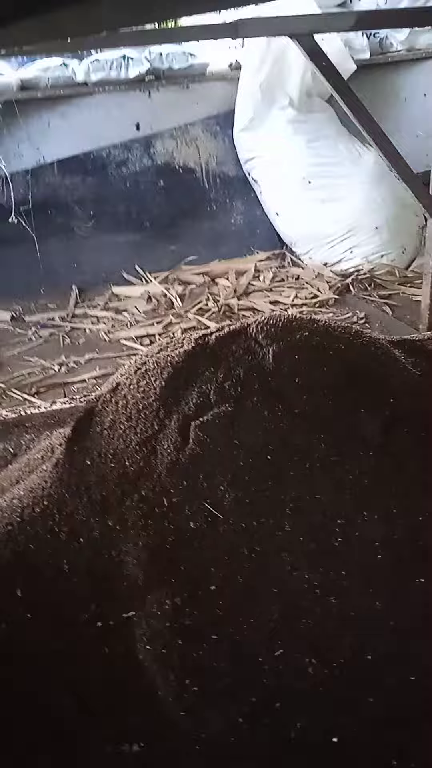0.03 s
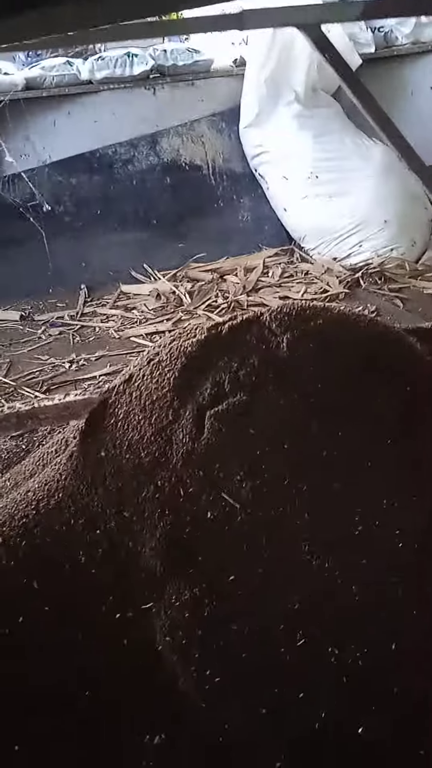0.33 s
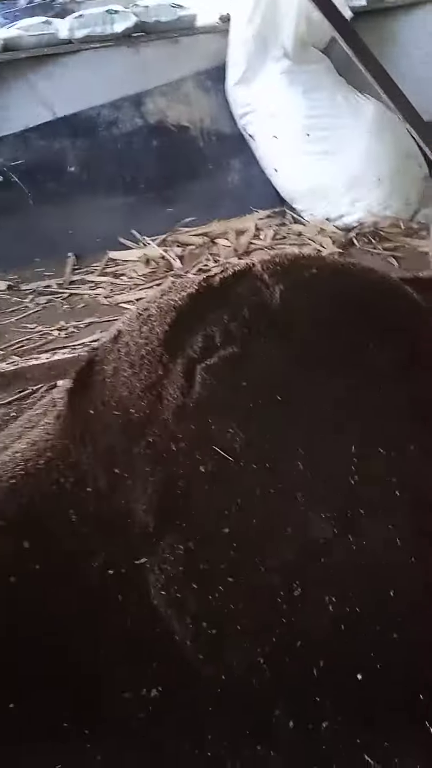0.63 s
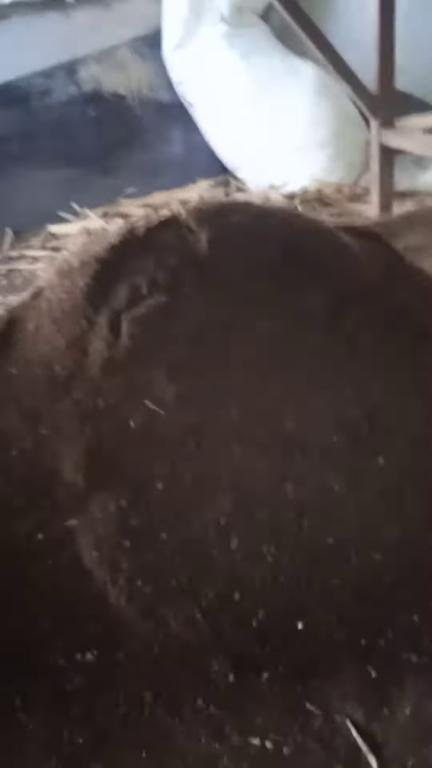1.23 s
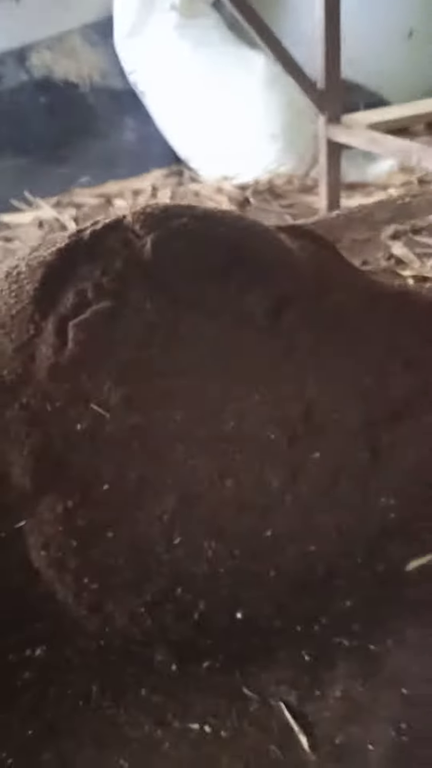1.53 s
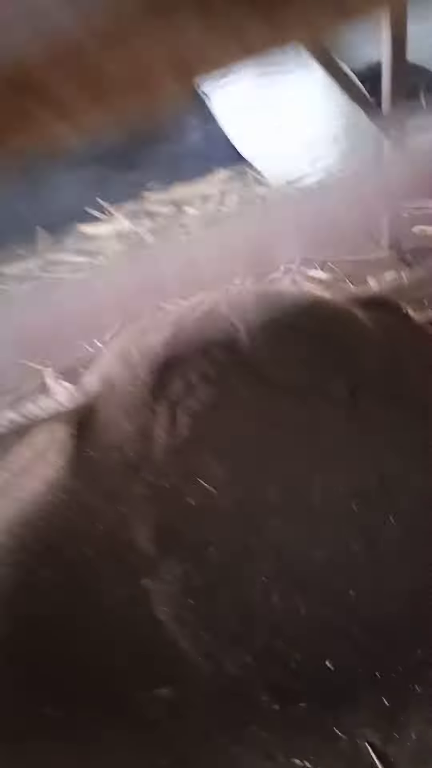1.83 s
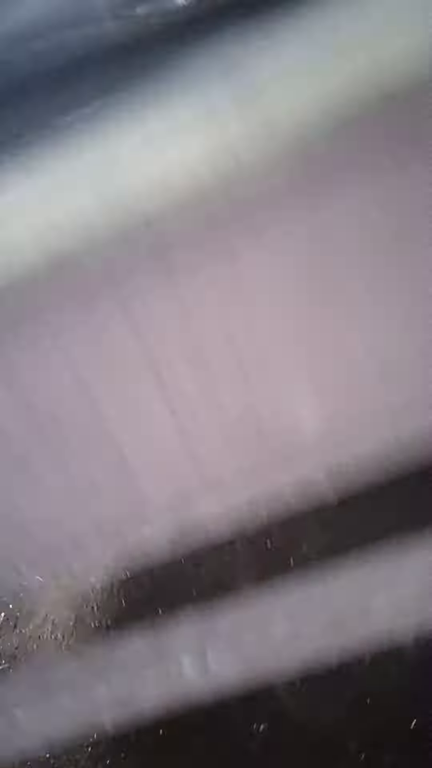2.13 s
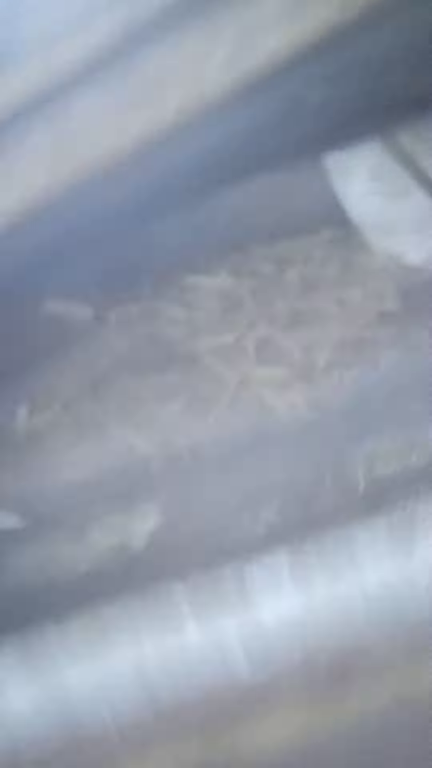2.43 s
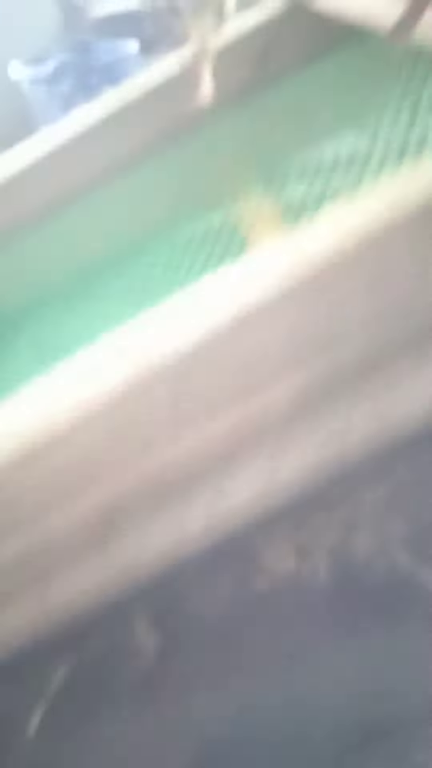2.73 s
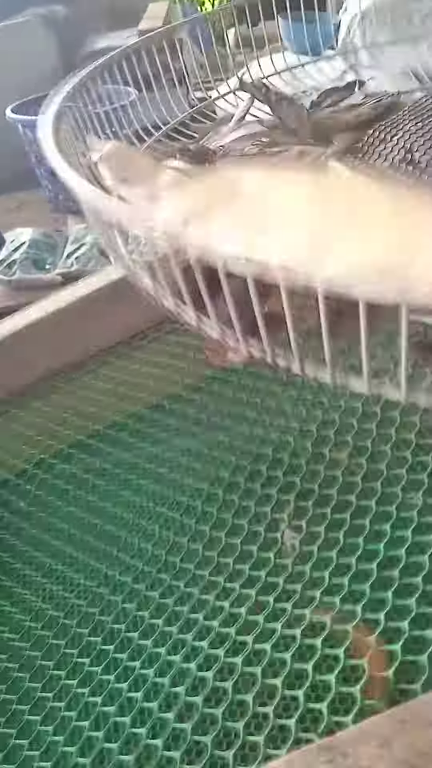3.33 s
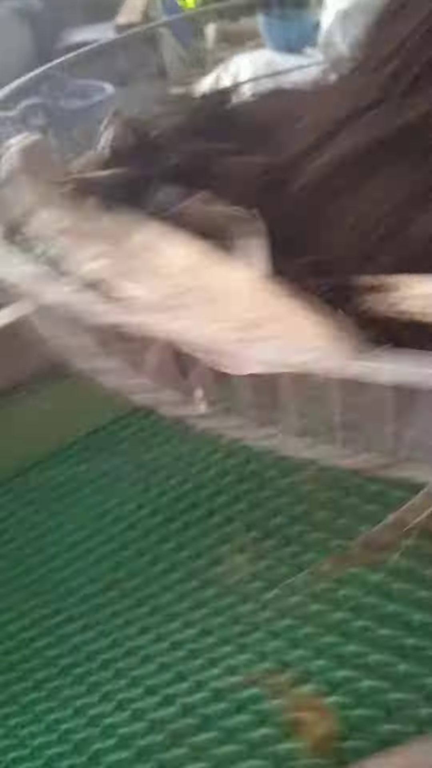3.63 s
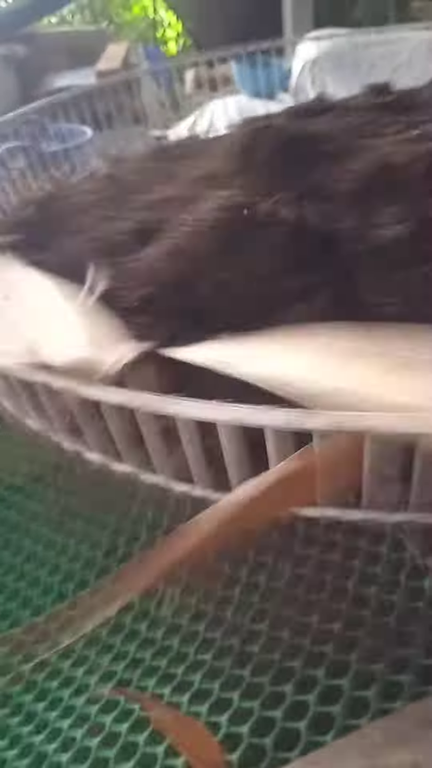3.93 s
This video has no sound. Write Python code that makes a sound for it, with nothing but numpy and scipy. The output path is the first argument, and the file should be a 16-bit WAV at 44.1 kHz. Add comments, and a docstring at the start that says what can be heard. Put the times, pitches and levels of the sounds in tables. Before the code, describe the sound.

Steady engine throb with the rhythmic clatter and hiss of a shaking sieve.

```python
"""Engine-driven sieve in a shed

A slow single-cylinder engine fires just under eight times a second; each exhaust pulse excites the
shed's low reverberation. In the same rhythm, random impacts rattle the sieve's wooden frame, clatter
its steel parts and make chaff hiss on the mesh. Single clanks and knocks ring over a drone and a rumble.
The listener moves from the heap below up to the sieve, where the direct thump stands out."""
import sys
import numpy as np
from scipy import signal
from scipy.fft import rfft, irfft, next_fast_len
from scipy.io import wavfile
from scipy.ndimage import uniform_filter1d, minimum_filter1d, map_coordinates

SR = 44100
rng = np.random.default_rng(int(sys.argv[2]) if len(sys.argv) > 2 else 0)


def store_wav(level_fs):
    """Save 16-bit WAV to argv[1]."""
    pcm = np.round(np.clip(np.atleast_2d(level_fs), -1, 1) * 32767)
    wavfile.write(sys.argv[1], SR, pcm.T.astype(np.int16))


N = 176400

FIRST_FIRING_S, CYCLE_S = .0998, .13117
# shaking envelopes: delay/s, rise/s, hold/s, fall/s, resting share
FRAME_STROKE = (-.008, .009, .076, .045, .56)
STEEL_STROKE = (-.007, .009, .105, .053, .69)
CHAFF_STROKE = (-.0058, .011, .092, .033, .5)

# listener's path: t/s, position (0 heap, 1 sieve)
PATH = [(.3, 0.028), (1.6, 0.066), (2.0, 0.44), (2.35, 0.47), (2.9, 0.9), (4, 0.99)]
# spectrum of the room's rumble: f/Hz, relative density/dB
RUMBLE_SPECTRUM = [(20, -51), (36, -46), (55, -25), (70, -16), (140, 3), (300, 2.5), (800, -14),
                   (3000, -57)]
# drone partials: multiple of the firing rate, relative level/dB
DRONE_HARMONICS = [(19, 0), (24, -12), (36, -8)]
# drone strength: t/s, level/dB
DRONE_LEVELS = [(.3, -48), (2.3, -53), (2.55, -41.5), (2.9, -40.5), (3.2, -34), (3.5, -39), (4, -45)]
# exhaust strength: t/s, reverberant gain/dB, direct gain/dB
EXHAUST_GAINS = [(.2, -39.5, -43), (.9, -37, -38), (1.7, -36, -37), (2.08, -42, -33), (2.33, -39, -24),
                 (2.72, -38.5, -21.5), (3.15, -35.5, -18), (3.38, -37, -15.5), (3.51, -36, -21),
                 (3.64, -39.5, -21.5), (3.78, -34.5, -18.5), (3.91, -38.5, -16.5)]
# spectra of the shed's reverberation at three positions: f/Hz, relative density/dB
BOOM_AT_HEAP = [(30, -62), (58, -30), (82, -12), (98, -12.5), (111, -17), (128, -5), (148, 1.5), (172, -5),
                (192, -2), (240, -6.5), (285, -10), (325, -5.5), (360, -16.5), (460, -13), (700, -31),
                (1500, -64)]
BOOM_AT_MIDWAY = [(30, -51), (58, -17.5), (85, -5.5), (115, -13.5), (150, -4), (200, -2.5), (270, -5),
                  (340, -3), (430, -2.5), (550, -7), (800, -25), (1500, -63)]
BOOM_AT_SIEVE = [(30, -71), (54, -45), (70, -17), (98, -6), (112, -13), (132, -6.5), (145, -4.5),
                 (165, -8.5), (184, 3), (212, -9), (232, 5), (258, -4), (274, -0.5), (305, -2.5),
                 (340, -3.5), (400, -11.5), (700, -20), (1500, -55)]
# early reflections of the thump: delay/s, relative level/dB
WALL_ECHOES = [(0.0224, -19), (.047, -19.5)]
# bass loss of the thump: f/Hz, gain/dB
THUMP_RESPONSE = [(25, -44), (50, -27), (75, -8), (140, -1), (600, 0)]
# spectra of frame, steel and chaff at three positions: f/Hz, relative density/dB
FRAME_AT_HEAP = [(150, -33), (300, -12), (480, -5.5), (570, -3), (640, 1), (730, -2.5), (820, 3),
                 (900, 1.5), (1000, 3), (1120, -3), (1280, -3), (1500, -7.5), (2200, -36), (5000, -75)]
FRAME_AT_MIDWAY = [(150, -33), (300, -6), (420, -4.5), (500, 0), (570, 2), (640, 4.5), (730, -1.5),
                   (880, -4.5), (1000, -0.5), (1120, 2), (1280, -4), (1500, -13.5), (2200, -28),
                   (5000, -68)]
FRAME_AT_SIEVE = [(150, -30), (300, -11), (470, -12), (570, -1.5), (635, 2.5), (730, -1), (850, 0.5),
                  (950, -1), (1100, -2), (1250, -3), (1500, -8), (2200, -26), (5000, -82)]
STEEL_AT_HEAP = [(700, -36), (1200, -8), (1450, -2.5), (1600, -0.5), (1720, 0), (1830, 1.5), (1990, 0.5),
                 (2080, -3.5), (2200, -3.5), (2500, -12.5), (3200, -25), (4500, -48.5)]
STEEL_AT_MIDWAY = [(700, -40), (1200, -16.5), (1450, -3), (1620, -2.5), (1750, 2), (1870, 2.5), (1990, 3.5),
                   (2080, -1.5), (2200, -3.5), (2500, -11), (3200, -23), (4500, -48.5)]
STEEL_AT_SIEVE = [(700, -40.5), (1200, -8.5), (1450, -3), (1600, -1.5), (1720, 0.5), (1830, 1.5), (1990, 1),
                  (2080, 0), (2200, -5.5), (2500, -12.5), (3200, -21), (4500, -48)]
CHAFF_AT_HEAP = [(800, -25.5), (2000, 0), (2600, 0), (3100, 2.5), (3500, -0.5), (3780, -1.5), (4050, -9.5),
                 (4800, -11.5), (5700, -9), (6600, -10), (7300, -17.5), (8000, -27), (10000, -32.5),
                 (12000, -41.5), (13900, -49), (14500, -35), (15800, -34)]
CHAFF_AT_MIDWAY = [(800, -26), (2000, -2), (2600, 1.5), (3100, 1), (3500, -2), (3780, 0.5), (4050, -9),
                   (4800, -9), (5700, -5), (6600, -10.5), (7300, -13.5), (8000, -26), (10000, -35),
                   (12000, -45), (13900, -50), (14500, -37), (15800, -36)]
CHAFF_AT_SIEVE = [(800, -30), (2000, -1), (2600, 0), (3100, 2.5), (3500, -1.5), (3780, -1.5), (4050, -8),
                  (4800, -9), (5700, -8.5), (6600, -12), (7300, -14.5), (8000, -24.5), (10000, -31.5),
                  (12000, -43), (14000, -43), (14500, -28), (15800, -26)]
# rattle strength: t/s, frame gain/dB, steel gain/dB, chaff gain/dB
RATTLE_GAINS = [(0.3, -31.5, -27, -33), (0.38, -29.5, -26.5, -33), (0.54, -28.5, -26.5, -31.5),
                (0.66, -30.5, -28, -34), (0.86, -30.5, -26, -34.0), (1.06, -29.5, -26, -32.5),
                (1.14, -31.5, -26, -32.5), (1.46, -30.5, -26, -31), (1.86, -30, -28, -37),
                (1.94, -28, -27, -34.5), (2.26, -28, -27.5, -36), (2.5, -29.5, -26, -35),
                (2.62, -31, -27.5, -35.5), (2.7, -31, -23.5, -35.5), (2.9, -27.5, -25.5, -37.0),
                (3.3, -25.5, -25.5, -35.5), (3.7, -28, -26.5, -36), (3.94, -31.5, -29.5, -43.5)]
# the load slides harder or softer: t/s, frame change/dB, steel change/dB, chaff change/dB
LOAD_SURGES = [(.51, -2, -0.5, 1), (.9, -3, -2.5, 1.5), (1.06, 3, 2, 4), (1.18, 0.5, 0, 0.5),
               (1.3, 1, 0, 0), (1.57, -1.5, 0, 0), (1.972, -1, 1, 3.5), (2.1, -1.5, -2, 0),
               (2.42, -1.5, -2.5, 3), (2.505, 3, 0.5, 1.5), (2.66, -1.5, -1, 0.5), (2.75, 0, 1.5, 3),
               (3.68, 4, 4.3, 0), (3.82, 2, 0.5, 0)]
# impacts of loose steel: t/s, f/Hz, level/dB
STEEL_STRIKES = [(.808, 1830, -20), (1.196, 1850, -22.5), (1.41, 1830, -20), (2.46, 1975, -21),
                 (2.502, 2050, -21), (2.718, 1825, -21), (2.748, 1715, -25), (2.762, 1950, -27),
                 (2.852, 1965, -21), (2.908, 1985, -17.5), (3.388, 1841, -16), (3.65, 1700, -24),
                 (3.685, 1763, -20)]
# colour of their contact noise: f/Hz, gain/dB
CLASH_RESPONSE = [(500, -18), (1700, 4), (3300, -6), (7000, -18), (10000, -43)]
# blows on the frame: t/s, level/dB
FRAME_STRIKES = [(2.197, -28), (2.328, -28.5), (3.158, -29)]
# modes of the frame: f/Hz, relative level/dB, T60/s
WOOD_MODES = [(231, -10.5, 0.22), (437, 2, 0.14), (593, -1, .07), (940, -5, .08), (1120, -7, 0.058)]
# stepped fade-in: t/s, gain/dB
FADE_IN = [(0, -120), (.076, -110), (.08, -22), (.097, -17.5), (.106, -14), (.2, -6), (.216, -2.5),
           (.34, 1.5)]


def amp(db):
    """Decibels to amplitude ratio."""
    return 10 ** (np.asarray(db) / 20)


def unit(x):
    """Normalisation to rms 1."""
    return x / np.sqrt(np.mean(x ** 2) + 1e-20)


def curves(rows):
    """Linear interpolation in time of each column, one value a sample."""
    times, *columns = np.transpose(rows)
    return [np.interp(np.arange(N) / SR, times, c) for c in columns]


def wobble(rate):
    """Spline interpolation of random knots, rate a second."""
    knots = rng.standard_normal(int(N * rate / SR) + 4)
    return map_coordinates(knots, [np.arange(N) * rate / SR])


def gain_at(points, hz):
    """Magnitude response from (f/Hz, gain/dB) points on a logarithmic frequency axis."""
    f, db = np.transpose(points)
    return amp(np.interp(np.log(hz + 1), np.log(f + 1), db))


def coloured(x, points):
    """Minimum-phase filtering: folding the cepstrum makes the response causal."""
    m = 2 * next_fast_len(N)
    gain = gain_at(points, np.fft.rfftfreq(m, 1 / SR))
    cepstrum = irfft(np.log(gain))[:m // 2]
    cepstrum[1:] *= 2
    return irfft(rfft(x, m) * np.exp(rfft(cepstrum, m)), m)[:N]


def along_path(versions):
    """Equal-power cross-fade of sounds heard at even steps from heap to sieve."""
    place = np.clip(curves(PATH)[0], 0, 1) * (len(versions) - 1)
    return sum(np.sqrt(np.maximum(1 - abs(place - k), 0)) * v for k, v in enumerate(versions))


def rumble(level_db=-51.5):
    """Stationary noise: the room's low background."""
    return amp(level_db) * unit(coloured(rng.standard_normal(N), RUMBLE_SPECTRUM))


def drone():
    """Periodic vibration: the machine hums at harmonics of its firing rate."""
    level_db, = curves(DRONE_LEVELS)
    cycles = np.arange(N) / SR / CYCLE_S
    return sum(amp(level_db + db + wobble(4)) * np.sin(2 * np.pi * (k * cycles + rng.random()))
               for k, db in DRONE_HARMONICS)


def firings(scatter_db=1.1):
    """Impulse train: one firing a cycle, slightly uneven in size."""
    at = np.round(np.arange(FIRST_FIRING_S, N / SR - .001, CYCLE_S) * SR).astype(int)
    train = np.zeros(N)
    train[at] = amp(scatter_db * rng.standard_normal(len(at)))
    return train


def boom_envelope(t, rise_s=.005, hold_s=.05, t60_s=.247):
    """Reverberation builds, holds and decays exponentially."""
    return (1 - np.exp(-t / rise_s)) * amp(-60 * np.maximum(t - hold_s, 0) / t60_s)


def shed_response(colour, passes=4, bins=400):
    """Impulse response of the shed: dense low echoes merge into a rounded throb."""
    span_s = 2 * CYCLE_S
    envelope = boom_envelope(np.arange(bins) / bins * span_s)
    gain = gain_at(colour, np.arange(bins) / span_s)
    spectrum = gain * np.exp(2j * np.pi * rng.random(bins))
    for _ in range(passes):  # impose envelope and spectrum in turn
        tail = envelope * np.exp(1j * np.angle(np.fft.ifft(spectrum)))
        spectrum = gain * np.exp(1j * np.angle(np.fft.fft(tail)))
    return irfft(spectrum, round(span_s * SR))


def boom(train, gush_db=-5):
    """Reverberant field: firings convolved with the shed's response, each with a noisy gush of gas."""
    since_firing = (np.arange(N) / SR - FIRST_FIRING_S) % CYCLE_S
    gush = unit(rng.standard_normal(N) * boom_envelope(since_firing))
    versions = []
    for colour in (BOOM_AT_HEAP, BOOM_AT_MIDWAY, BOOM_AT_SIEVE):
        echoes = unit(signal.fftconvolve(train, shed_response(colour))[:N])
        versions.append(unit(echoes + amp(gush_db) * unit(coloured(gush, colour))))
    return along_path(versions)


def thump(train, hz=241, sigma_s=.0019):
    """Direct sound and early reflections: a pressure pulse and its delayed copies from hard walls."""
    def pulse(t):
        return -np.sin(2 * np.pi * hz * t) * np.exp(-.5 * (t / sigma_s) ** 2)
    t = np.arange(SR // 10) / SR - 2 * sigma_s
    arrivals = pulse(t) + sum(amp(db) * pulse(t - delay) for delay, db in WALL_ECHOES)
    return coloured(signal.fftconvolve(train, arrivals)[:N], THUMP_RESPONSE)


def exhaust():
    """The direct-to-reverberant ratio of the firings rises towards the sieve."""
    train = firings()
    reverberant_db, direct_db = curves(EXHAUST_GAINS)
    return amp(reverberant_db) * boom(train) + amp(direct_db) * thump(train)


def patchy(x, depth_db):
    """Spectral modulation: narrow resonances come and go as loose parts shift."""
    spectra = signal.stft(x, nperseg=1024)[2]
    field = uniform_filter1d(rng.standard_normal(spectra.shape), 3, axis=0)
    field = uniform_filter1d(field, 5, axis=1)
    return signal.istft(spectra * amp(depth_db * unit(field)), nperseg=1024)[1][:N]


def shaking(delay, rise, hold, fall, rest, sag_s=.13):
    """Periodic amplitude modulation: each firing shakes a part, then the motion eases."""
    t = (np.arange(N) / SR - FIRST_FIRING_S - delay) % CYCLE_S
    shake = np.minimum(t / rise, 1) * np.exp(-2 * np.maximum(t - hold, 0) / fall - t / sag_s)
    return unit(rest + (1 - rest) * shake)


def rattle(colours, stroke, contacts_per_s, wash, uneven_db, patchy_db):
    """Shot noise: random contacts in a wash of their echoes excite one part's resonances."""
    versions = []
    for colour in colours:
        contacts = (rng.random(N) < contacts_per_s / SR) * rng.choice([-1, 1], N)
        echoes = wash * patchy(rng.standard_normal(N), patchy_db)
        drive = (unit(contacts) + echoes) * shaking(*stroke) * amp(uneven_db * wobble(55))
        versions.append(unit(coloured(drive, colour)))
    return along_path(versions)


def sieve(surge_sigma_s=.022, trims_db=(-.93, -1.44, 1.5)):
    """Forced vibration: frame, steel and chaff rattle in step with the engine as the load slides."""
    t = np.arange(N) / SR
    surge_db = sum(np.outer(db, np.exp(-.5 * ((t - s) / surge_sigma_s) ** 2)) for s, *db in LOAD_SURGES)
    gains_db = np.array(curves(RATTLE_GAINS)) + surge_db
    frame = rattle([FRAME_AT_HEAP, FRAME_AT_MIDWAY, FRAME_AT_SIEVE], FRAME_STROKE,
                   contacts_per_s=900, wash=2.45, uneven_db=.5, patchy_db=2)
    steel = rattle([STEEL_AT_HEAP, STEEL_AT_MIDWAY, STEEL_AT_SIEVE], STEEL_STROKE,
                   contacts_per_s=900, wash=2, uneven_db=.5, patchy_db=2.5)
    chaff = rattle([CHAFF_AT_HEAP, CHAFF_AT_MIDWAY, CHAFF_AT_SIEVE], CHAFF_STROKE,
                   contacts_per_s=1700, wash=2.2, uneven_db=.96, patchy_db=2.5)
    return sum(amp(db + trim) * part for db, trim, part in zip(gains_db, trims_db, (frame, steel, chaff)))


def ring(start_s, hz, rise_s, t60_s):
    """Damped free vibration of one mode."""
    t = np.maximum(np.arange(N) / SR - start_s, 0)
    envelope = (1 - np.exp(-t / rise_s)) * amp(-60 * t / t60_s)
    return envelope * np.sin(2 * np.pi * (hz * t + rng.random()))


def clanks(clash_db=-2, clash_t60_s=.07):
    """Impact excitation: loose steel parts ring, each on its own note, over a burst of contact noise."""
    t = np.arange(N) / SR
    notes = sum(amp(db) * ring(s, hz, rise_s=.0036, t60_s=.16) for s, hz, db in STEEL_STRIKES)
    bursts = sum(amp(db - 60 * abs(t - s) / clash_t60_s) * (t > s) for s, _, db in STEEL_STRIKES)
    return notes + coloured(amp(clash_db) * bursts * rng.standard_normal(N), CLASH_RESPONSE)


def knocks():
    """Modal superposition: each blow rings the modes of the wooden frame together."""
    return sum(amp(db + mode_db) * ring(s, hz, rise_s=.003, t60_s=t60)
               for s, db in FRAME_STRIKES for hz, mode_db, t60 in WOOD_MODES)


def scene():
    """Linear superposition of room, engine and sieve in one channel."""
    return (rumble() + drone() + exhaust() + sieve() + clanks() + knocks())[None]


def record(dry, ceiling_db=-12.5, top_hz=15800):
    """Gain control and band limiting: a fade-in, a smooth peak limiter and a sharp low-pass."""
    fade_db, = curves(FADE_IN)
    x = dry * amp(fade_db)
    gain = np.minimum(1, amp(ceiling_db) / (abs(x) + 1e-9))
    x = x * uniform_filter1d(minimum_filter1d(gain, size=400), size=400)
    m = next_fast_len(N + SR // 2)
    passband = np.fft.rfftfreq(m, 1 / SR) < top_hz
    return irfft(rfft(x, m) * passband, m)[:, :N]


dry = scene()
out = record(dry)
store_wav(out)
```